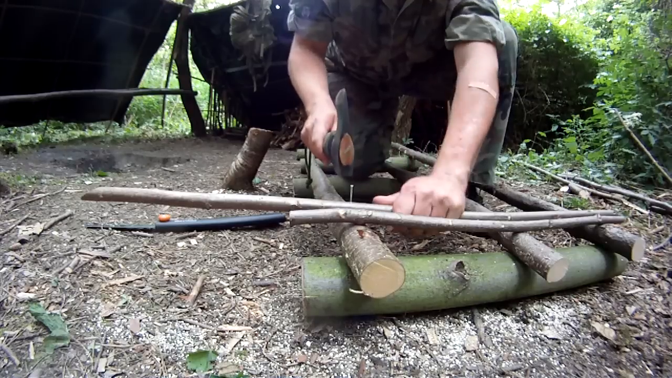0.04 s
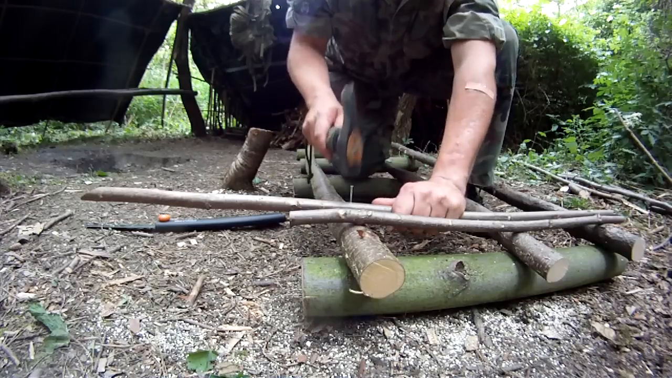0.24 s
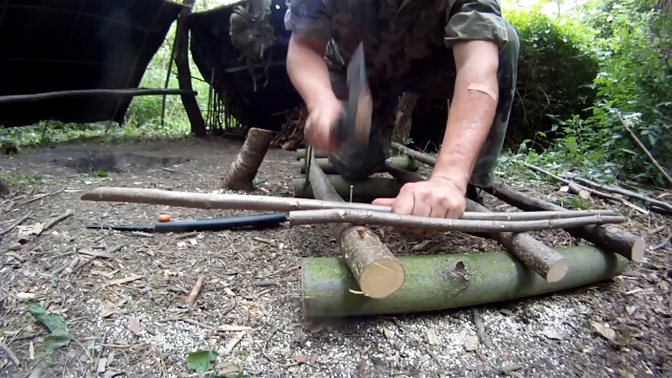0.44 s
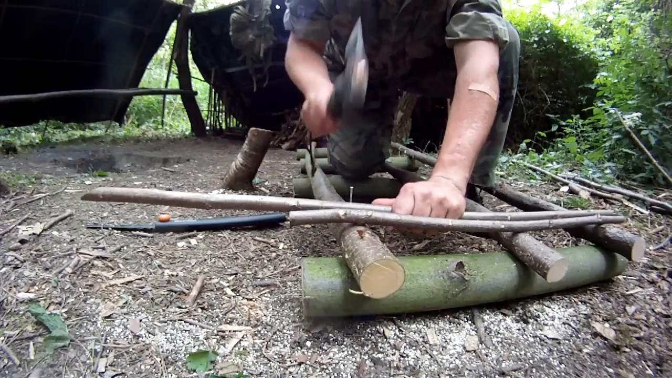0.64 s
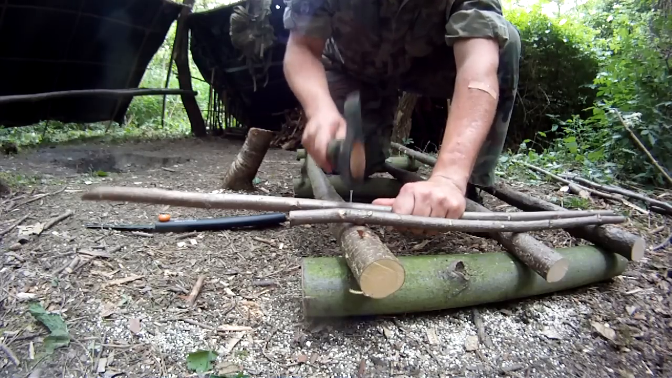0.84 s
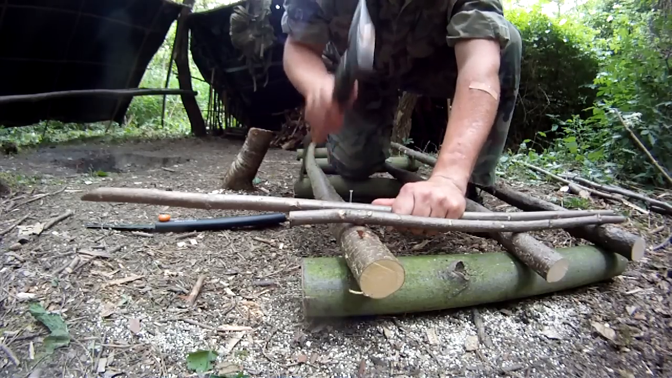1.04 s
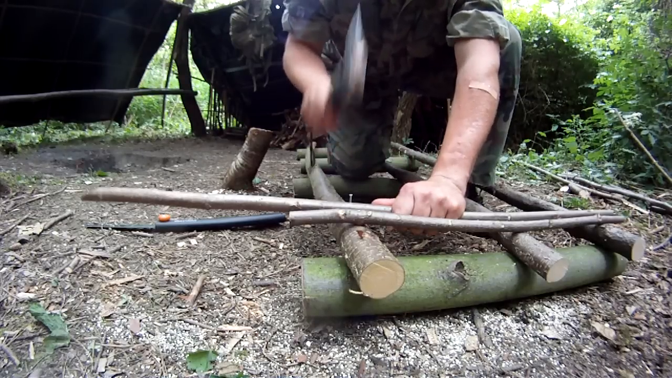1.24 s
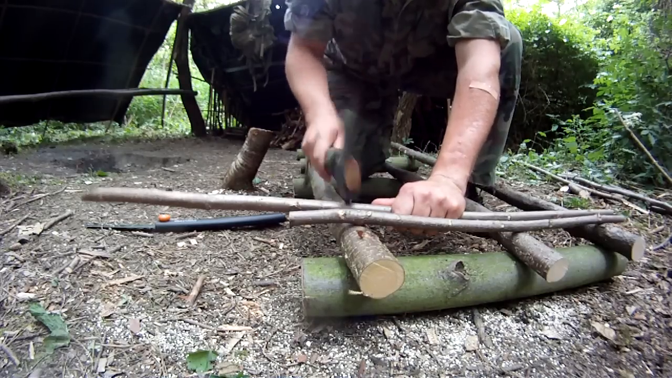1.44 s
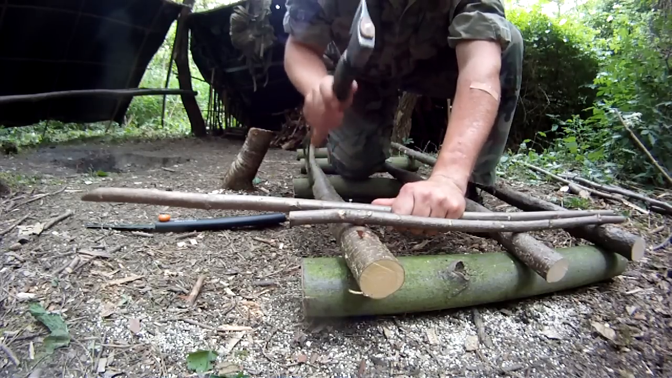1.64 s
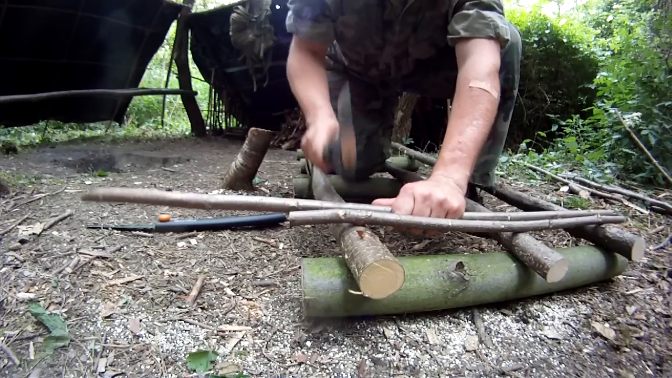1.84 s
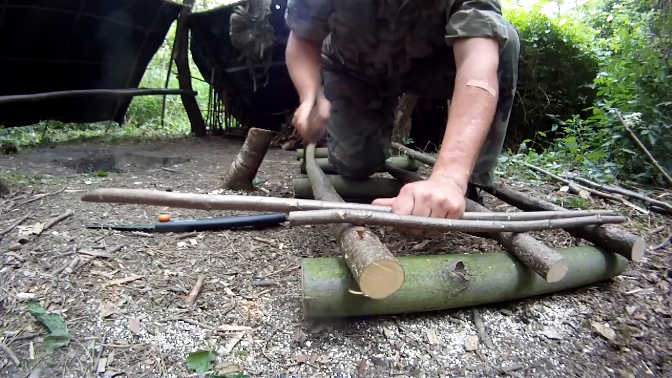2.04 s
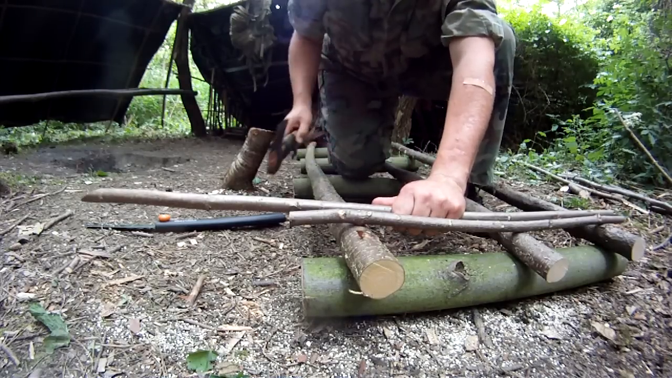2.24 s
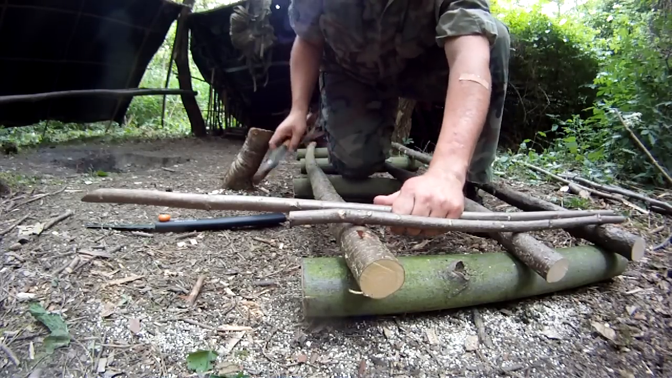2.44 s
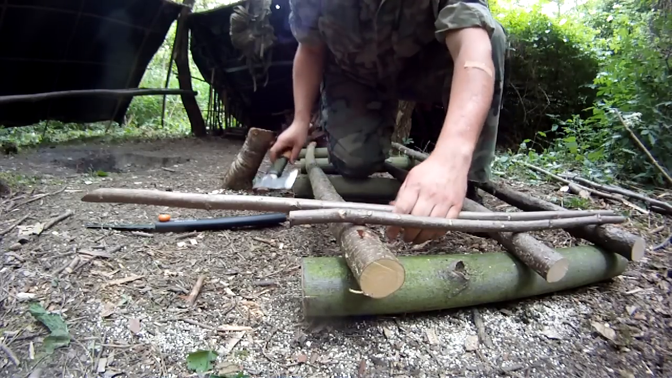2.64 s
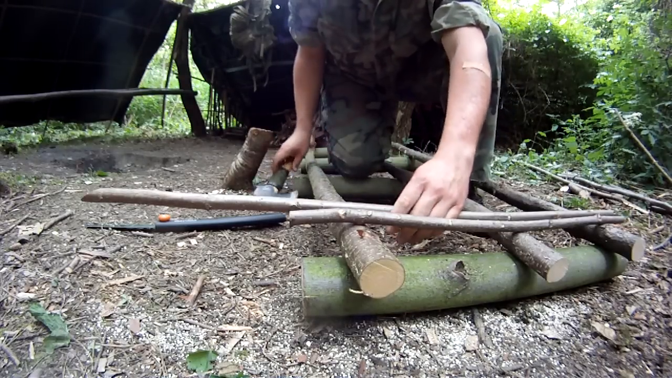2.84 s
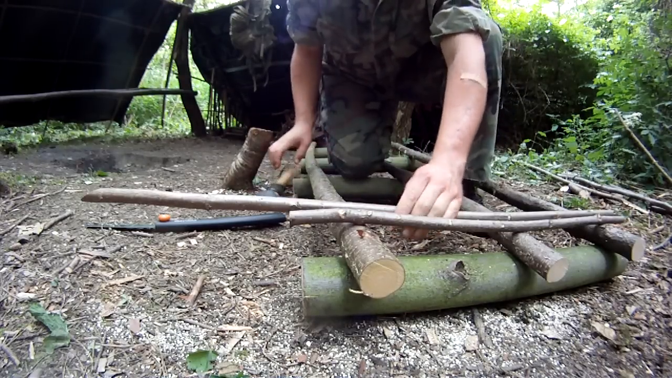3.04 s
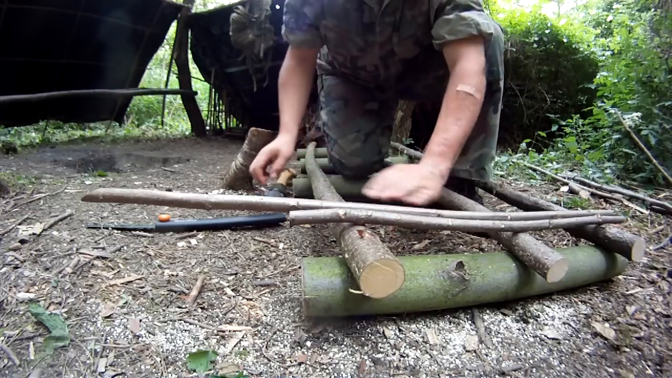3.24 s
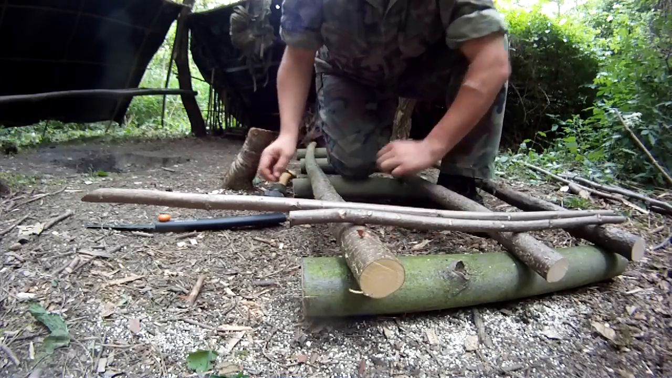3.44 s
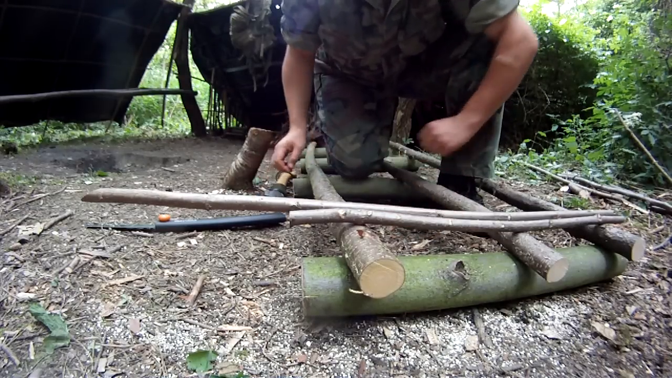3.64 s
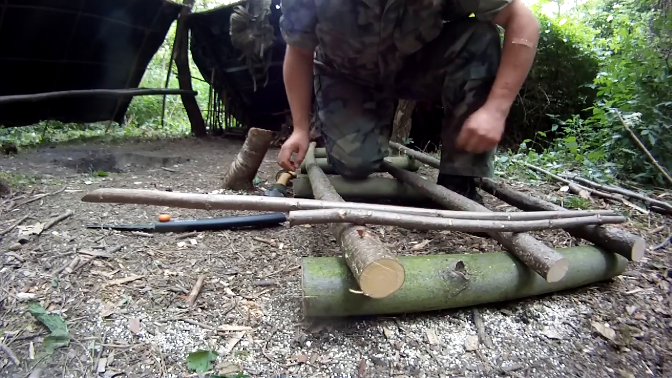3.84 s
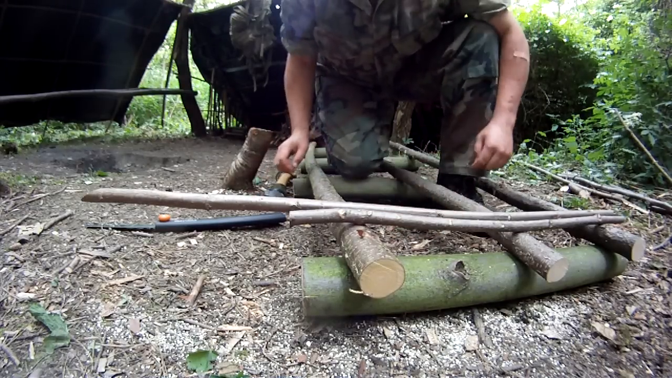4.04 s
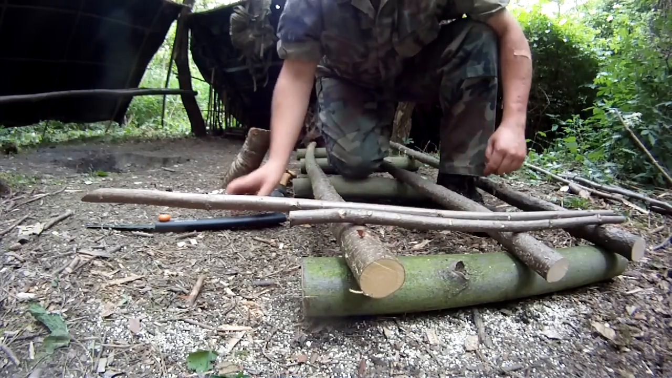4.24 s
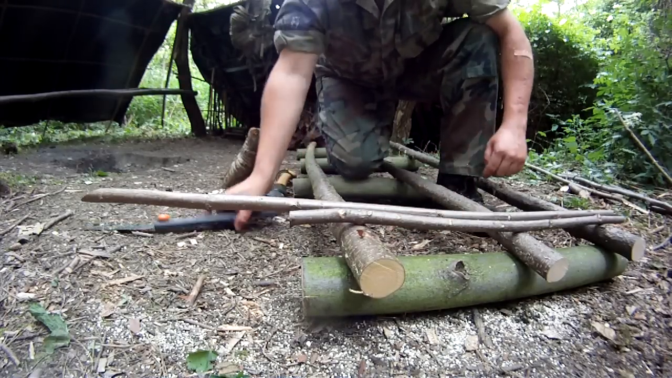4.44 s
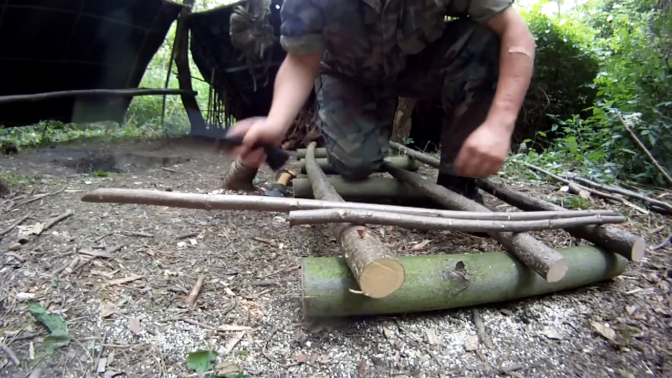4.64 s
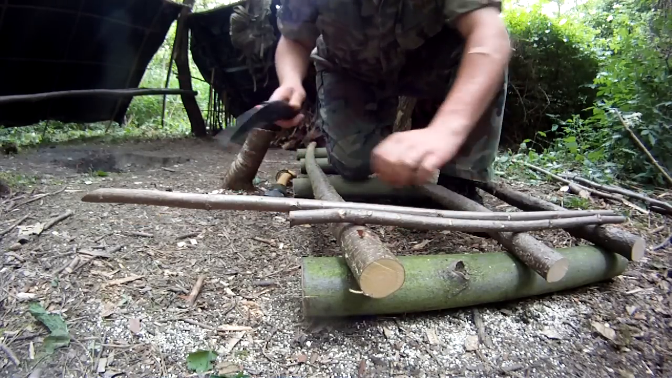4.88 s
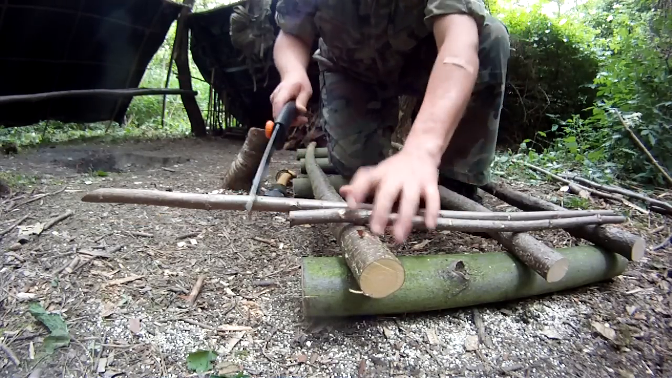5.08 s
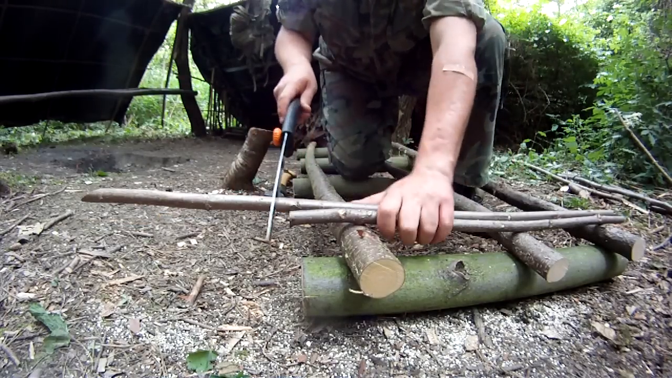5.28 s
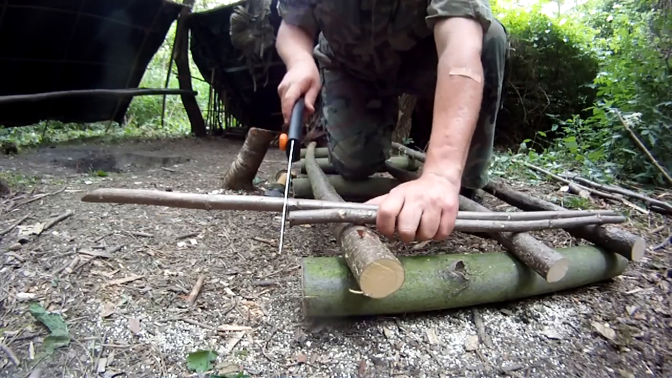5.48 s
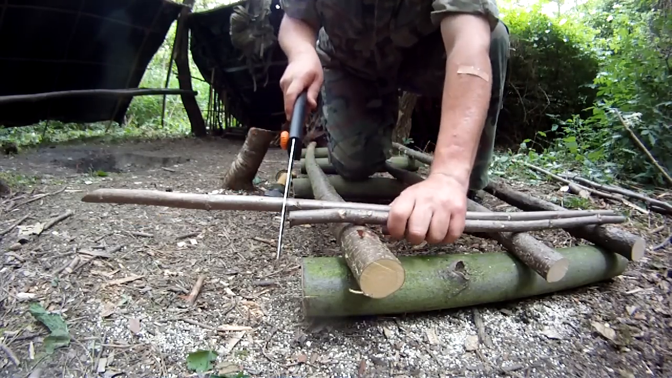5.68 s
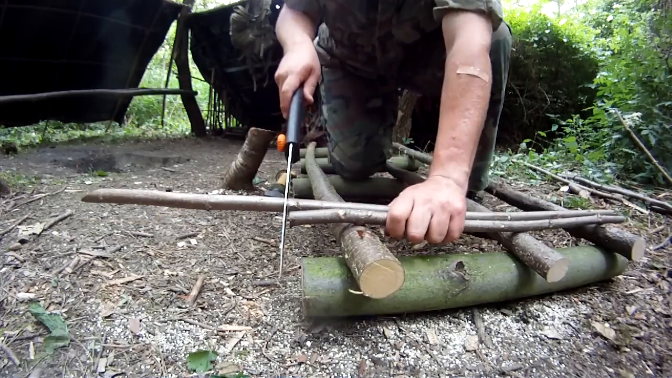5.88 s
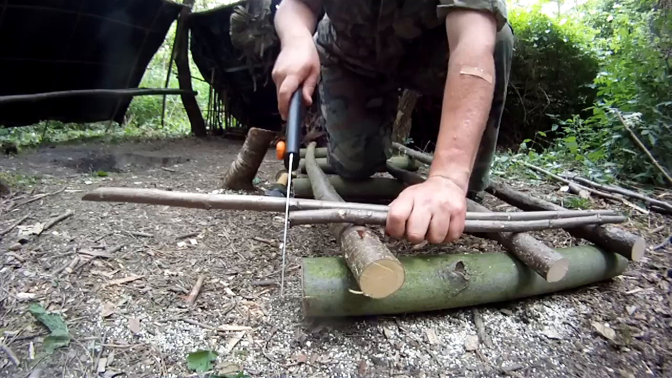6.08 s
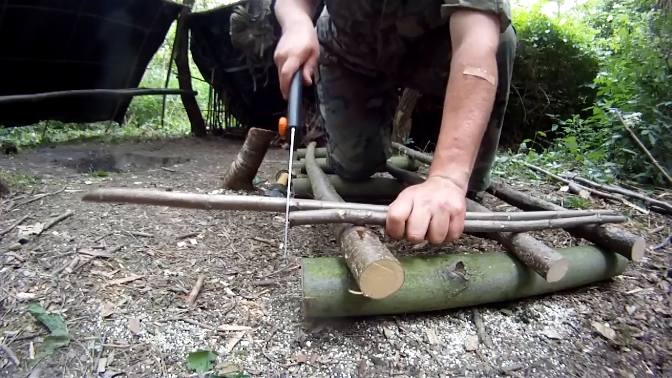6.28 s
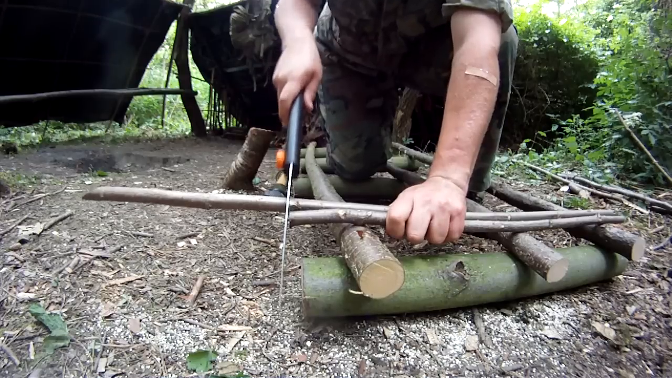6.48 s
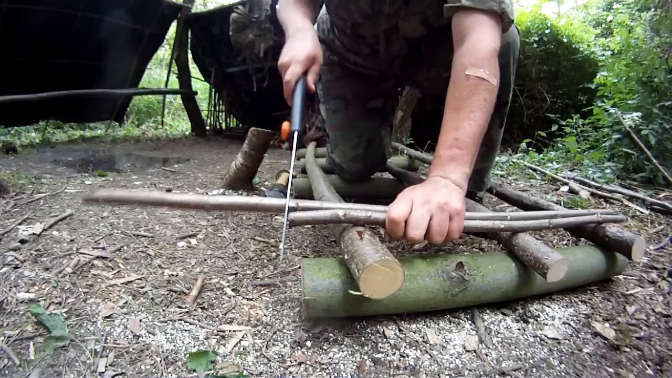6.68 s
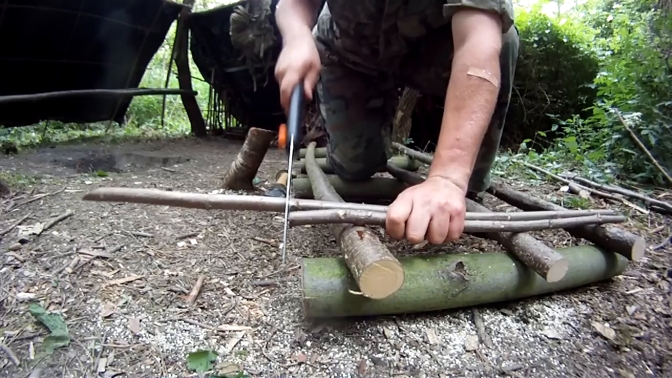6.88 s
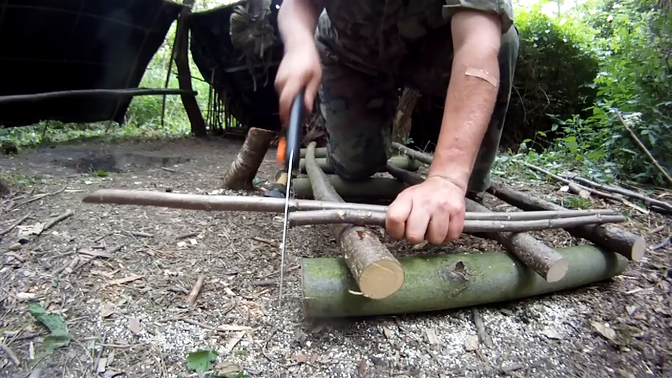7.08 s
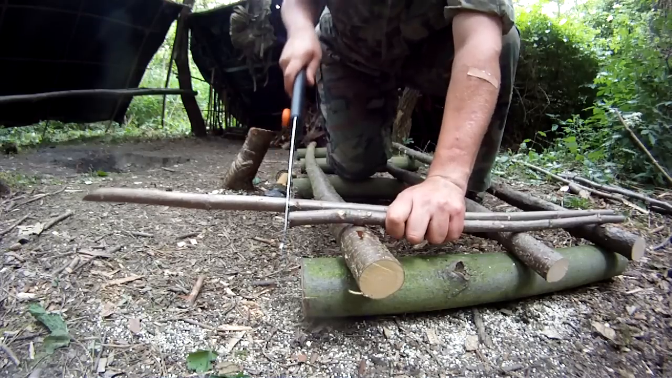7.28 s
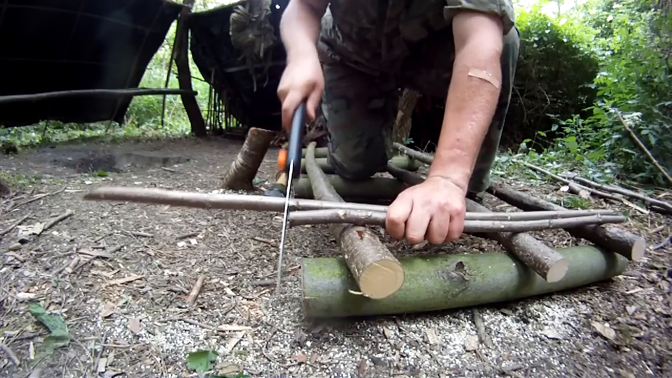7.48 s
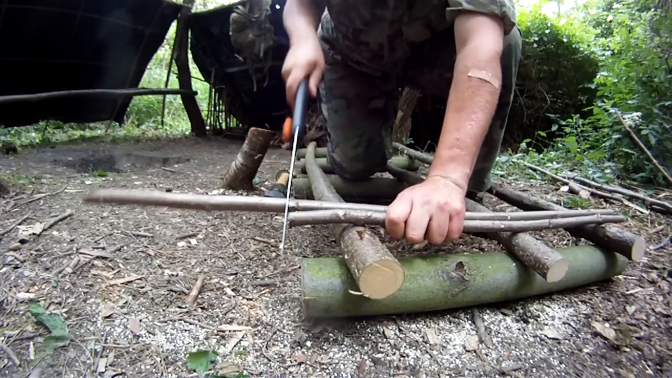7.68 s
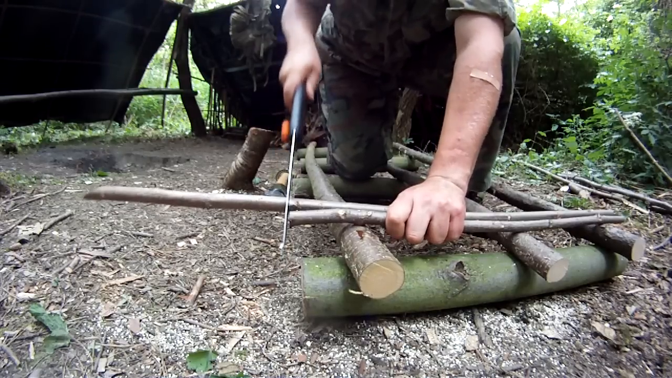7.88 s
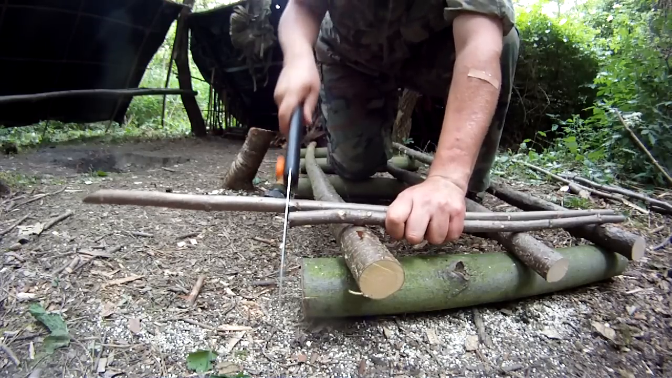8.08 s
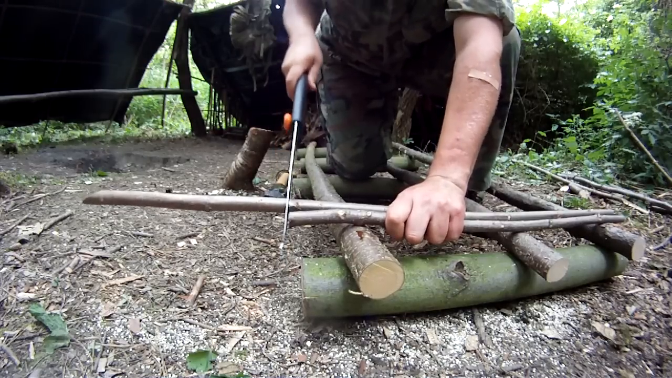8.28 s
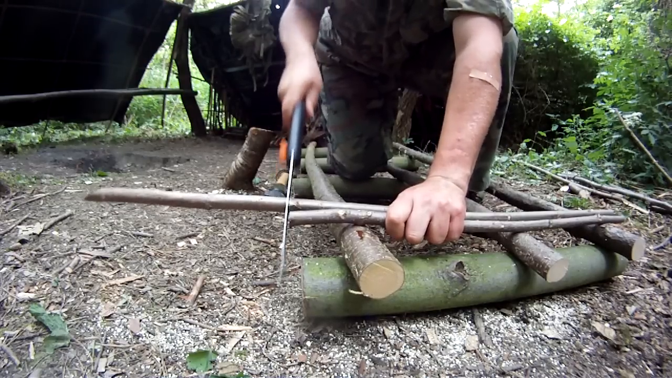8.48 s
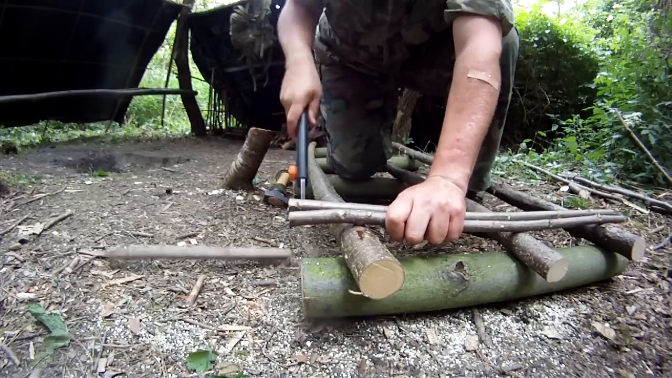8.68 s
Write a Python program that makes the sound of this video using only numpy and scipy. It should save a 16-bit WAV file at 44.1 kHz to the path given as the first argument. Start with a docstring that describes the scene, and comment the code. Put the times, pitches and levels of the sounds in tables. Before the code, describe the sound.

Five steady, clipped-sounding cracks of metal on a nail in a log frame, answered by trees. Then quieter handling: a light wooden clack, two soft earth thuds, cloth rubbing, ticking twigs, a far songbird whistling. Finally brisk sawing, bright pulls alternating with hollow, weaker pushes, the pole shuddering and knocking on the frame. Close, cheap camera microphone in open woodland, with low murmur and faint hiss.

```python
"""The back of a hatchet drives a nail through a thin pole into a frame of logs, in a forest clearing: five blows.
Each blow adds a crack, dying tones of wood, a thump of the ground and an echo of noise from the trees.
The pole clacks on the frame, the hatchet is put down with dull thuds, and sleeves rustle as shaped noise.
Then a pruning saw cuts the green pole: jolts from its teeth excite resonances of blade and pole.
A songbird whistles far off. The small camera samples coarsely, which mirrors every sound into a glassy treble."""
import sys
import numpy as np
from scipy import signal
from scipy.fft import rfft, irfft
from scipy.io import wavfile
from scipy.ndimage import uniform_filter1d

SR = 44100
rng = np.random.default_rng(int(sys.argv[2]) if len(sys.argv) > 2 else 0)


def int16_out(signal):
    """Quantize to a 16-bit WAV file."""
    q = np.round(np.clip(np.atleast_2d(signal).T, -1, 1) * 32767)
    wavfile.write(sys.argv[1], SR, q.astype(np.int16))


N = 384552


def amp(db):
    """Turns decibels into a gain."""
    return 10 ** (np.asarray(db) / 20)


def unit(x):
    """Scales a sound to an rms (average strength) of 1."""
    return x / np.sqrt(np.mean(x ** 2) + 1e-20)


def add(mix, s, sound):
    """Mixes a sound in at time s, in seconds."""
    part = mix[max(round(s * SR), 0):][:len(sound)]
    part += sound[:len(part)]


def coloured(points, size):
    """Makes noise of rms 1 whose spectrum follows the given points."""
    hz, db = np.transpose(points)
    shape_db = np.interp(np.log(np.fft.rfftfreq(size, 1 / SR) + 1), np.log(hz), db)
    spectrum = rfft(rng.standard_normal(size)) * amp(shape_db)
    return unit(irfft(spectrum, size))


def wander(hz, size=N):
    """Makes a slow random drift of rms 1, with changes up to about hz."""
    keep_slow = np.exp(-(np.fft.rfftfreq(size, 1 / SR) / hz) ** 2)
    return unit(irfft(rfft(rng.standard_normal(size)) * keep_slow, size))


def resonate(x, peaks, scatter=0):
    """Passes a force through steep parallel resonances, each detuned by chance if scatter is set; rms 1."""
    out = np.zeros(len(x))
    for hz, width, db in peaks:
        b, a = signal.iirpeak(hz * (1 + scatter * rng.standard_normal()), hz / width, SR)
        once = signal.lfilter(b, a, x)
        out += amp(db) * signal.lfilter(b, a, once)  # filtered twice for steep sides
    return unit(out)


def ring(modes, pitch=1, travel_ms=1, rise_ms=.3, scatter=0.0082):
    """Dying modes of a struck body; bending waves carry the high ones to the air first."""
    out = np.zeros(SR // 2)
    for hz, db, t60 in modes:
        delay = travel_ms / 1000 / np.sqrt(hz / 1000)  # travel_ms is the delay at 1000 Hz
        t = np.maximum(np.arange(len(out)) / SR - delay, 0)
        swell = 1 - np.exp(-1000 * t / rise_ms)
        detuned_hz = hz * pitch * (1 + scatter * rng.standard_normal())
        out += swell * amp(db - 60 * t / t60) * np.sin(2 * np.pi * detuned_hz * t)
    return out


# How strongly the trees echo each pitch: (frequency [Hz], relative level [dB])
TREE_ECHO = [(80, -12.5), (250, -0.5), (500, -2.5), (850, -13.5), (1400, -10.5), (2000, -1), (3000, -1.5),
             (4000, -3.5), (5000, -2.5), (6000, -8.5)]


def forest(x, t60, build_s, linger_db=-27, linger_t60=1.4, lumpy_db=1.5):
    """Echo thrown back in clumps by the trunks: it builds up, drops quickly, then lingers faintly."""
    t = np.arange(SR) / SR
    build = 1 - np.exp(-(t / build_s) ** 2)
    fade = amp(-60 * t / t60) + amp(linger_db - 60 * t / linger_t60)
    clumps = amp(lumpy_db * wander(120, size=SR))
    tail = coloured(TREE_ECHO, size=SR) * build * fade * clumps
    return signal.fftconvolve(x, tail / np.linalg.norm(tail))[:N]


# Still air of the forest: (frequency [Hz], relative level [dB per Hz])
AIR_SPECTRUM = [(15, -25.5), (25, -2.5), (65, -0.5), (135, -7), (186, -13.5), (267, -11), (321, -16),
                (506, -20.5), (958, -29.5), (1660, -29.5), (2800, -27.5), (4940, -35.5), (5800, -40),
                (7540, -82), (12800, -120)]
AIR_DB = -49.5


def air():
    """Low murmur and faint hiss of the forest: shaped noise that gently swells."""
    return amp(AIR_DB) * coloured(AIR_SPECTRUM, size=N) * amp(0.23 * wander(9.8))


def far_notes(count):
    """Faint notes of other birds deeper in the wood, as rows like those of the song."""
    when, length, pitch, glide, loud = rng.random((count, 5)).T
    start = when * (N / SR - .3)
    hz = 1900 * 2 ** pitch
    return np.transpose([start, 0.059 + 0.11 * length, hz, hz * (0.84 + 0.31 * glide), -71 + 6 * loud])


# The clearest bird notes:
# (time [s], length [s], first pitch [Hz], last pitch [Hz], relative level [dB])
SONG_NOTES = [(0.68, 0.12, 2834, 2750, -58), (1, 0.15, 3580, 3400, -65), (1.29, 0.25, 3050, 2850, -59.5),
              (1.62, 0.18, 2170, 2190, -54.5), (1.972, 0.2, 3030, 3100, -57.5),
              (2.46, 0.084, 2080, 2170, -62.5), (2.518, 0.054, 2810, 2580, -58),
              (2.922, 0.041, 2220, 2280, -61), (3.157, 0.057, 2178, 2317, -53),
              (3.417, 0.18, 2570, 2678, -54), (3.847, 0.13, 3640, 3195, -55),
              (4.212, 0.07, 2690, 2226, -56.5), (4.411, 0.16, 2430, 2426, -56.5),
              (4.569, 0.19, 3103, 3150, -57.5), (4.85, 0.074, 3420, 3460, -56),
              (4.902, 0.046, 3110, 3010, -55), (4.968, 0.066, 4230, 4050, -54),
              (4.982, 0.043, 2250, 2205, -54), (5.194, 0.14, 3392, 3360, -53.5),
              (5.263, 0.097, 2640, 2340, -61), (5.39, 0.1, 2873, 2750, -52),
              (5.524, 0.079, 2450, 2290, -55.5), (5.704, 0.038, 3327, 2990, -51.5),
              (5.74, 0.097, 2800, 2897, -49.5), (5.872, 0.066, 4040, 4170, -58),
              (5.908, 0.064, 2300, 2120, -52), (6.168, 0.045, 2560, 2720, -55.5),
              (6.35, 0.14, 2954, 2920, -52)]


def bird():
    """Gliding, warbled whistles, heard both directly and by way of the trees."""
    song = np.zeros(N)
    for s, length, first_hz, last_hz, db in [*SONG_NOTES, *far_notes(count=20)]:
        count = round(length * SR)
        warble = .02 * wander(260, size=count)
        hz = np.linspace(first_hz, last_hz, count) * (1 + warble)
        whistle = np.sin(2 * np.pi * np.cumsum(hz) / SR)
        add(song, s, amp(db) * signal.windows.tukey(count, .4) * whistle)
    echo = forest(song, t60=0.93, build_s=0.0055, linger_db=-15.0, linger_t60=1.8)
    return amp(2.5) * song + amp(-1.5) * echo


# Sleeves rustle as the saw is fetched and set on the pole: (time [s], length [s], level [dB])
SLEEVE_RUSTLES = [(4.2, 0.38, -59.5), (4.579, 0.44, -60.5), (4.881, 0.23, -57.5)]
# Rubbing cloth: (frequency [Hz], relative level [dB per Hz])
CLOTH_SPECTRUM = [(60, -7), (230, 10), (700, -5), (1250, -2), (1900, 3.5), (2800, -13), (5000, -17),
                  (7000, -35)]
# Bits of dry litter tick underfoot: (time [s], level [dB])
LITTER_TICKS = [(2.247, -46.5), (2.968, -48), (4.548, -46.5), (5.512, -49)]
# Tones of a dry twig, detuned by chance: (frequency [Hz], relative level [dB], time to fall 60 dB [s])
TWIG_MODES = [(1160, -0.5, .015), (1800, 0.5, .015), (2480, -4, .012), (3680, -1, 0.011)]


def stirring():
    """Cloth rubs in uneven spurts of shaped noise, and twigs tick with short dying tones."""
    out = np.zeros(N)
    for s, length, db in SLEEVE_RUSTLES:
        count = round(length * SR)
        spurts = amp(db + 2.3 * wander(40, size=count))
        add(out, s, spurts * np.hanning(count) * coloured(CLOTH_SPECTRUM, size=count))
    for s, db in LITTER_TICKS:
        add(out, s, amp(db) * ring(TWIG_MODES, scatter=0.16))
    return out


# Light knocks of wood on wood: (time [s], level [dB], contact time [ms])
WOOD_KNOCKS = [(3.005, -19.5, 0.76), (3.028, -27, 1.07), (3.0586, -30.5, 0.6), (7.501, -23, 0.64),
               (7.818, -24, 0.62), (7.982, -21.5, 0.59), (8.4564, -14, 0.46), (8.479, -20, 0.47),
               (8.62, -17, 0.75)]
# Tones of the loose pole: (frequency [Hz], relative level [dB], time to fall 60 dB [s])
POLE_MODES = [(146.5, -18, 0.4), (226.6, -6, 0.079), (308.4, -10.5, 0.14), (406, -8.5, 0.12),
              (530, -9, 0.095), (571.3, 1, 0.087), (697, -14.5, 0.12), (930, -35, 0.044),
              (1140, -10, 0.033), (1240, -16.5, 0.095), (1740, -8, 0.036), (2100, 4, 0.048)]
# Dull thuds on the earth: (time [s], level [dB], frequency [Hz])
EARTH_THUDS = [(4.262, -36.5, 309), (4.285, -32, 254)]


def knocking():
    """The pole bumps on the frame; a longer contact is duller. The earth takes dull thuds."""
    out = np.zeros(N)
    for s, db, contact_ms in WOOD_KNOCKS:
        ms = np.arange(200) * 1000 / SR
        push = np.sin(np.pi * np.minimum(ms / contact_ms, 1))
        pole = ring(POLE_MODES, travel_ms=0.42, rise_ms=2.0)
        add(out, s, amp(db) * np.convolve(pole, push / push.sum()))
    for s, db, hz in EARTH_THUDS:
        cycles = (np.arange(N) / SR - s) * hz
        out -= amp(db) * np.cos(2 * np.pi * cycles) * np.exp(-(cycles / 0.5) ** 2)
    return out


def teeth(speed, teeth_per_s, tear_db, rub):
    """Force in the cut: one uneven jolt for each passing tooth, and the rub of the blade's sides."""
    size = len(speed)
    rate = teeth_per_s * (.4 + speed) * (1 + .25 * wander(300, size=size))
    passed = np.cumsum(rate) / SR
    tear = amp(tear_db * np.clip(rng.standard_normal(size), -2, 2))
    jolts = np.diff(np.floor(passed), prepend=0) * tear
    steady_push = uniform_filter1d(jolts, size=200)
    return unit(jolts - steady_push) + rub * rng.standard_normal(size)


def arch(phase, crest):
    """Rises from 0 to 1 at the share crest of a stroke and falls back to 0."""
    return np.sin(np.pi * np.interp(phase, [0, np.clip(crest, .1, .9), 1], [0, .5, 1])).clip(0)


# Rasp of the teeth in the blade: (frequency [Hz], filter width [Hz], relative level [dB])
RASP_PEAKS = [(876, 300, -12), (1137, 67, -3.5), (1447, 103, 8), (1808, 136, 14), (2146, 53, 8.5),
              (2342, 780, 11), (3110, 160, 11.5), (3394, 170, 12), (3844, 380, 12), (4770, 280, 3.5),
              (4980, 410, 2.5)]
# Hollow scrape of the blade's side in the cut: (frequency [Hz], filter width [Hz], relative level [dB])
SCRAPE_PEAKS = [(950, 55, 3.5), (1386, 95, 6), (1746, 220, 5), (2150, 190, 6), (2670, 320, -5),
                (3130, 250, -0.5), (3840, 230, -20)]
# The blade hops in the cut: average rate (Hz) and unevenness (share)
HOP_HZ, HOP_SPREAD = 53.8, 0.11
# The wave from the blade's free tip returns after this time (s) at a stroke's start and end, with this gain
TIP_FIRST_S, TIP_LAST_S, TIP_GAIN = 0.002706, 0.00164, 0.29
# As the cut deepens the higher modes of the pole gain: first tilt (dB per octave), growth (dB per octave per s)
FIRST_TILT_DB, TILT_DB_PER_S = -5, 3.5
# The teeth first skate at this level (dB), then catch after a delay (s), within a short time (s)
SKATE_DB, CATCH_S, CATCH_RISE_S = -3, 0.011, .004
# Below this share of full speed the sound fades out towards each turn
TURN_SPEED = 0.09


def stroke(s, length, rasp_db, shake_db, hop, body_peaks, scrape_db, teeth_per_s, tear_db, rub,
           bite_at, bite_power, lean_at, lean_db):
    """One stroke: teeth rasp as the blade moves; scrape and shaking swell as the hand leans on it."""
    t = np.arange(round(length * SR)) / SR
    speed = arch(t / length, .5)
    force = teeth(speed, teeth_per_s, tear_db, rub)
    hop_hz = HOP_HZ * (1 + HOP_SPREAD * wander(25, size=len(t)))
    hops = 1 + np.clip(hop, 0, 1) * np.cos(2 * np.pi * np.cumsum(hop_hz) / SR)
    # the returning wave combs the rasp, and the comb sweeps as the free length changes
    returned = np.interp(t - np.linspace(TIP_FIRST_S, TIP_LAST_S, len(t)), t, force)
    rasp = resonate((force + TIP_GAIN * returned) * hops, RASP_PEAKS, scatter=0.012)
    scrape = amp(scrape_db) * resonate(force * hops, SCRAPE_PEAKS, scatter=0.022)
    tilt_db = FIRST_TILT_DB + TILT_DB_PER_S * (s - PULL_STROKES[0][0])
    tilted_peaks = [(hz, width, db + tilt_db * np.log2(hz)) for hz, width, db in body_peaks]
    body = resonate(force, tilted_peaks, scatter=0.01)
    caught = np.clip((t - CATCH_S) / CATCH_RISE_S, 0, 1)
    bite = arch(t / length, bite_at) ** bite_power * amp(SKATE_DB * (1 - caught))
    lean = amp(lean_db * (arch(t / length, lean_at) ** 1.37 - 1))
    blade = amp(rasp_db) * (bite * rasp + lean * scrape)
    pole = amp(shake_db) * lean * body
    return (blade + pole) * np.minimum(speed / TURN_SPEED, 1)


# Cutting strokes towards the body, levels before the swells of the stroke: (time [s], length [s],
# rasp [dB], shaking of the pole [dB], hopping of the blade [0-1], rocking of the frame [dB])
PULL_STROKES = [(6.176, 0.23, -41.5, -41, 0.25, -67), (6.571, .18, -38.5, -35.5, 0.53, -48),
                (6.911, 0.17, -38, -33, 0.34, -50), (7.238, 0.18, -36.5, -31.5, 0.34, -44),
                (7.565, .17, -36.5, -32, 0.25, -39.5), (7.894, .164, -34, -31, 0.26, -54),
                (8.219, .166, -35.5, -31, 0.63, -39), (8.535, 0.18, -32.5, -28.5, 0.72, -36.5)]
# Lighter return strokes, levels as above: (time [s], length [s], rasp [dB], shaking of the pole [dB])
PUSH_STROKES = [(6.411, 0.17, -53, -39), (6.771, 0.13, -48.5, -40.5), (7.09, .146, -46.5, -37.5),
                (7.422, 0.14, -45.5, -35), (7.746, .144, -46.5, -30), (8.065, .154, -45.5, -30),
                (8.396, .14, -45, -28)]
PUSH_HOP = .15  # hopping of the blade on a return stroke, 0-1
# The pole under a pull, before the tilt: (frequency [Hz], filter width [Hz], relative level [dB])
PULL_BODY_PEAKS = [(232, 91, 8.5), (312, 100, -2), (428, 85, 1), (541, 103, 2), (609, 29, -2.5)]
# The pole under a push, before the tilt: (frequency [Hz], filter width [Hz], relative level [dB])
PUSH_BODY_PEAKS = [(215.6, 38, 1), (302, 98, -2), (464, 78, -6), (557.5, 68, 4), (637, 49, -2)]


def sawing():
    """Pulls bite coarsely with a bright rasp; pushes slide with a hollow scrape."""
    # bite_at, lean_at: share of the stroke at which the rasp and the hand's pressure peak
    # lean_db: how far that pressure swells; teeth_per_s: base rate, which then follows the speed
    out = np.zeros(N)
    for *row, _ in PULL_STROKES:
        pull = stroke(*row, PULL_BODY_PEAKS, scrape_db=-14, teeth_per_s=560, tear_db=5, rub=.5,
                      bite_at=0.39, bite_power=0.92, lean_at=.6, lean_db=14.5)
        add(out, row[0], pull)
    for row in PUSH_STROKES:
        push = stroke(*row, PUSH_HOP, PUSH_BODY_PEAKS, scrape_db=6.5, teeth_per_s=520, tear_db=4.0, rub=0.49,
                      bite_at=.25, bite_power=.42, lean_at=0.66, lean_db=21)
        add(out, row[0], push)
    return out


# The frame rocks on the ground with each pull: (frequency [Hz], filter width [Hz], relative level [dB])
ROCK_PEAKS = [(52.4, 24, 0), (95, 40, -6)]
ROCK_LAG_S, ROCK_S = 0.0098, 0.29  # lag and length of the swell
# The teeth catch and the pole judders: (time [s], length [s], frequency [Hz], level [dB])
POLE_JUDDERS = [(6.681, 0.024, 226, -28.5), (6.722, 0.014, 222, -33), (6.99, 0.052, 225, -37),
                (7.33, 0.028, 230, -35), (7.933, 0.074, 226.6, -18), (7.978, 0.031, 425.5, -22.5)]


def shaking():
    """Each pull rocks the whole frame, and stick and slip makes the pole judder in short tones."""
    out, count = np.zeros(N), round(ROCK_S * SR)
    for s, *_, rock_db in PULL_STROKES:
        rocking = resonate(wander(110, size=count), ROCK_PEAKS)
        add(out, s + ROCK_LAG_S, amp(rock_db) * np.hanning(count) * rocking)
    for s, length, hz, db in POLE_JUDDERS:
        t = np.arange(round(length * SR)) / SR
        turn = 2 * np.pi * hz * t
        judder = np.sin(turn) + 0.082 * np.sin(2 * turn)
        add(out, s, amp(db) * signal.windows.tukey(len(t), .5) * judder)
    return out


# Hatchet blows: (time [s], relative crack [dB], relative ring of the frame [dB],
# factor on the frame's pitch, relative thump of the ground [dB], relative forest echo [dB])
HATCHET_BLOWS = [(0.5907, 0.5, -2, 0.96, 0, -0.5), (0.9048, 1, -5.5, 1.1, 5.5, 1),
                 (1.2198, 1.5, 1.5, 0.92, 7, 0), (1.5379, 2, 1.5, 0.92, 6.5, 0),
                 (1.8428, 4.5, 5, 0.98, 3.5, -0.5)]
# Hatchet head, nail and pole together: (frequency [Hz], relative level [dB], time to fall 60 dB [s])
CRACK_MODES = [(560, -17.5, .045), (922, -16, .025), (1090, -15, 0.032), (1247, -11.5, .022),
               (1410, -21.5, 0.021), (1755, -7.5, .02), (2020, -16.5, 0.025), (2701, 0, .013),
               (3285, 2, 0.011), (3910, -6.5, 0.015), (4400, -23, 0.0074), (4700, -22, 0.031),
               (5750, -14, 0.03)]
# The log frame, before the pitch factor: (frequency [Hz], relative level [dB], time to fall 60 dB [s])
FRAME_MODES = [(208, -37, 0.19), (298, -34, .12), (410, -22, .14), (450, -32, 0.076), (535, -21.5, .13),
               (624, -22, 0.12), (674, -29.5, 0.06), (770, -30.5, .08), (970, -31.5, .08),
               (1133, -29.5, 0.096), (1320, -37.5, .08)]
# The frame bouncing on the ground: (frequency [Hz], relative level [dB], time to fall 60 dB [s])
GROUND_MODES = [(60, -38.5, 0.25), (91, -27, 0.075), (122, -28, 0.17), (148.3, -34, .08)]


def hammering():
    """Each blow: a hard crack with the grit of the nail slipping in, the frame ringing, the trees answering."""
    near, sent, t = np.zeros(N), np.zeros(N), np.arange(SR // 2) / SR
    for s, crack_db, frame_db, pitch, ground_db, echo_db in HATCHET_BLOWS:
        grit_shape = amp(-6.0 - 60 * t / .025) * (1 - np.exp(-t / 0.00047))
        grit = rng.standard_normal(len(t)) * grit_shape
        crack = ring(CRACK_MODES, travel_ms=1.1, rise_ms=1.2, scatter=0.01)
        frame = ring(FRAME_MODES, pitch, travel_ms=1.4, rise_ms=1.8, scatter=.007)
        ground = ring(GROUND_MODES, travel_ms=0.52, rise_ms=2.7, scatter=0.21)
        add(near, s, amp(crack_db + 3.0) * (crack + grit))
        add(near, s, amp(frame_db) * frame)
        add(near, s, amp(ground_db) * ground)
        add(sent, s, amp([echo_db - 2.0]))  # a single click that sets off the echo
    return near + forest(sent, t60=.25, build_s=0.023, linger_db=-26.5, linger_t60=1.3)


def scene():
    """All sources at the camera."""
    saw = sawing()
    saw_echo = amp(-21.5) * forest(saw, t60=0.25, build_s=0.009)
    background = air() + bird() + stirring()
    return (background + knocking() + shaking() + saw + saw_echo + hammering())[None]


HOLD_HZ, EDGE_HZ = 12000, 15700  # coarse sampling rate, and upper edge of the mirrored treble


def record(dry):
    """Sampled at a low rate, clipped, each sample held: the steps mirror the sound into the treble."""
    smooth = signal.oaconvolve(dry[0], signal.firwin(121, 5750, fs=SR), "same")
    coarse = signal.resample_poly(smooth, HOLD_HZ, SR)
    held = np.repeat(np.clip(coarse, -.92, .92), 4)
    fine = signal.resample_poly(held, SR, 4 * HOLD_HZ)[:N]
    edge = signal.firwin(201, EDGE_HZ, window=("kaiser", 8), fs=SR)
    return signal.oaconvolve(fine, edge, "same")[None]


dry = scene()
out = record(dry)
int16_out(out)
```